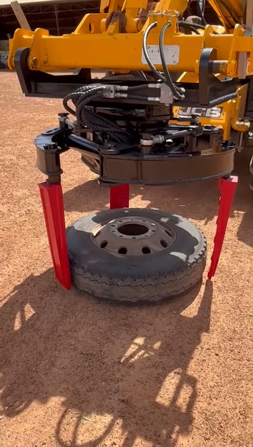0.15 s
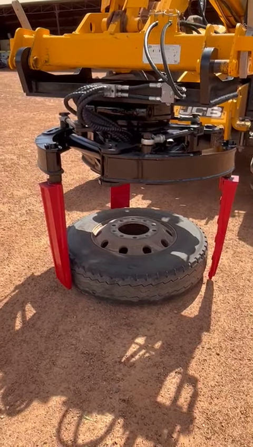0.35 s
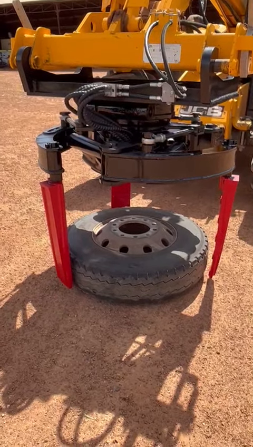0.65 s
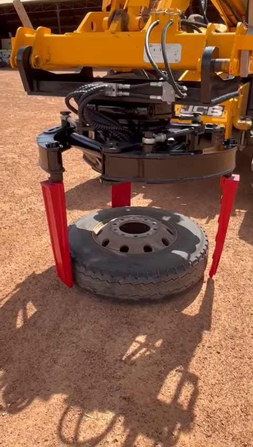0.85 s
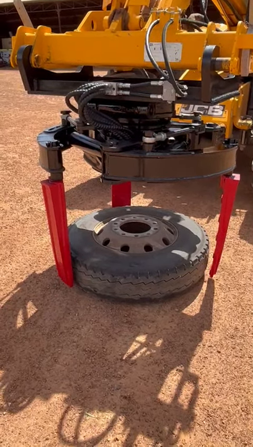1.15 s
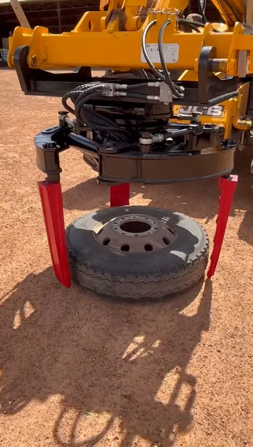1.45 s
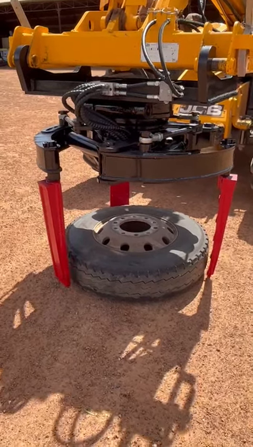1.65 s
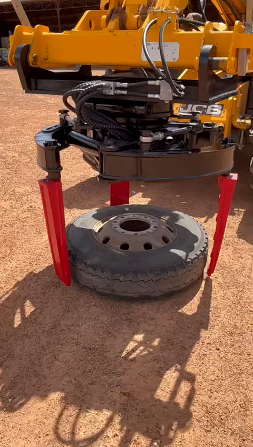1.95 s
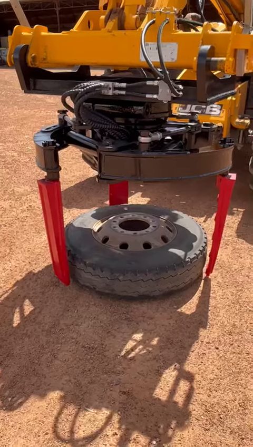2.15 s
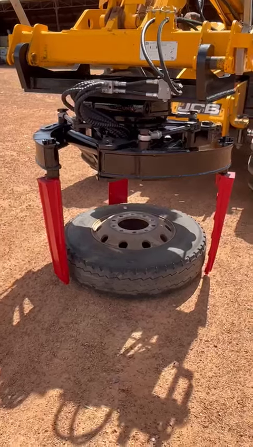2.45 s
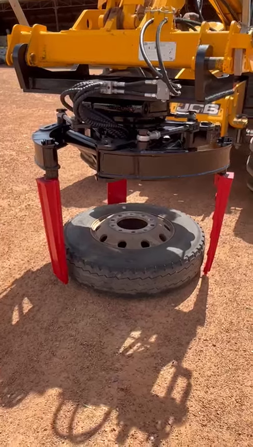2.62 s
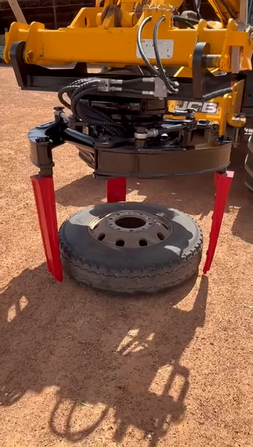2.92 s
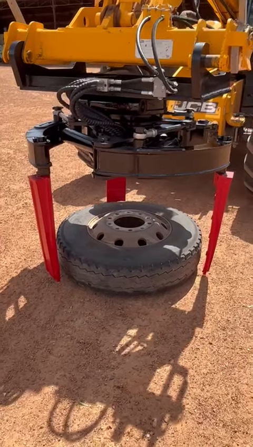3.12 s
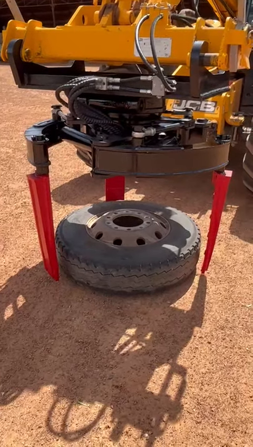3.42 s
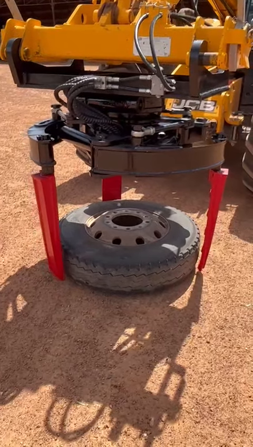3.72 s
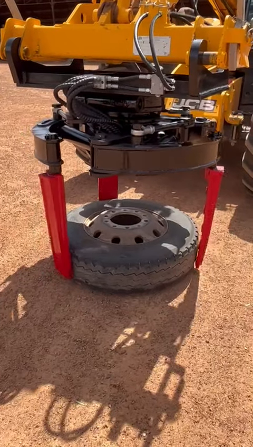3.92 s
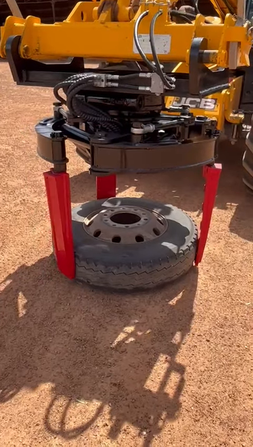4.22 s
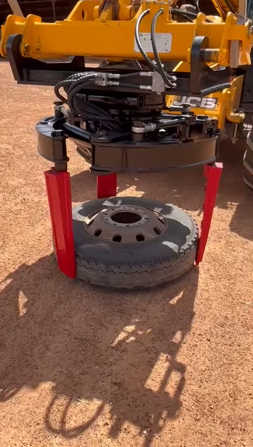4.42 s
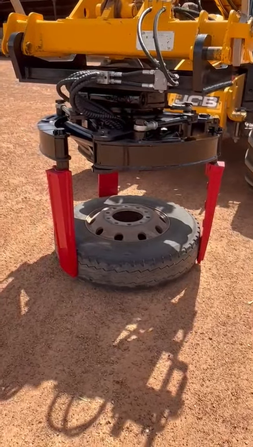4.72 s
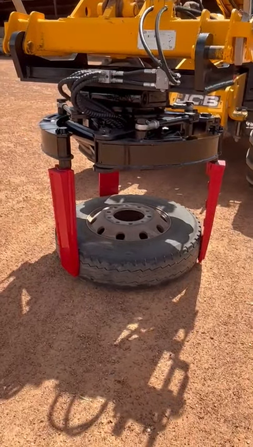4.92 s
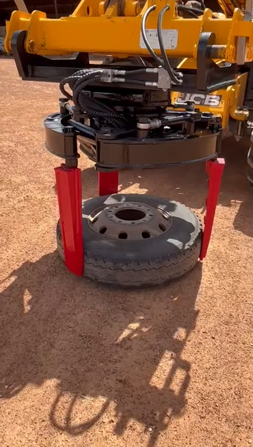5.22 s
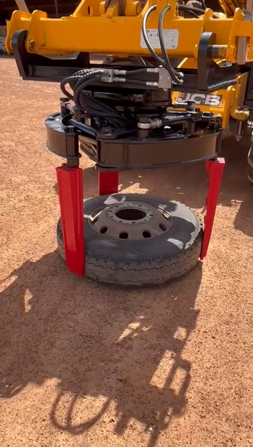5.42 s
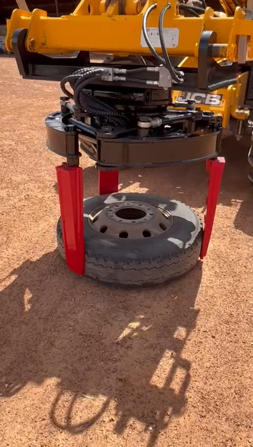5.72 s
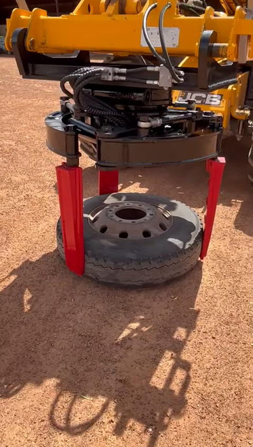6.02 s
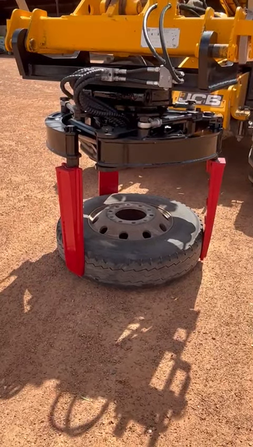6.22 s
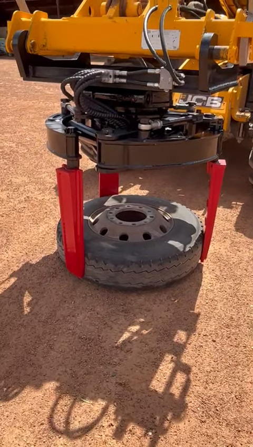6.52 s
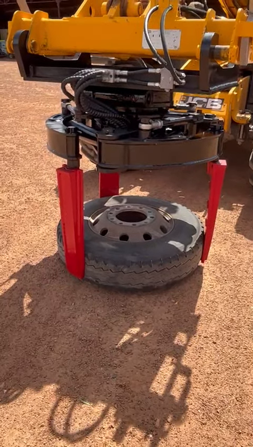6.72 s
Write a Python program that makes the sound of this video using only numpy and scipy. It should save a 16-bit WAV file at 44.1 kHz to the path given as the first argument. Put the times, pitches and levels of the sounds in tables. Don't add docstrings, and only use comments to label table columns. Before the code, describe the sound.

A diesel machine idles with a clattering rattle and hydraulic hiss while gusts of wind rumble and tear across the microphone in an open yard.

```python
import sys
import numpy as np
from scipy import signal
from scipy.fft import rfft, irfft, next_fast_len
from scipy.io import wavfile
from scipy.ndimage import uniform_filter1d

SR = 44100
rng = np.random.default_rng(int(sys.argv[2]) if len(sys.argv) > 2 else 0)


def undo_db(level):
    steps = np.asarray(level, float) / 20
    return 10 ** steps


def transcribe(signal):
    frames = np.atleast_2d(signal).T
    limited = np.clip(frames, -1, 1)
    pcm = np.round(limited * 32767).astype(np.int16)
    wavfile.write(sys.argv[1], SR, pcm)


N = 302721
T = np.arange(N) / SR


def evened(x):
    return x / np.sqrt(np.mean(x ** 2, axis=-1, keepdims=True) + 1e-20)


def curve(rows, order=1, at_s=T):
    rows = np.array(rows)
    return np.interp(at_s, rows[:, 0], rows[:, order])


# frequency in Hz, lead in radians.
PORT_PHASE = [(60, 1.4), (330, 2), (480, 3.1), (700, 4.6), (1000, 5.5), (1800, 5.5), (2700, 8.1),
              (4000, 8.3), (7000, 4.7)]


def noise_pair(mid_rows, side_rows, alike):
    size = next_fast_len(N)
    log_hz = np.log(np.fft.rfftfreq(size, 1 / SR) + 1)

    def read(rows, end):
        rows = np.array(rows)
        return np.interp(log_hz, np.log(rows[:, 0] + 1), rows[:, 1], end, end)

    mid, other = rfft(rng.standard_normal((2, size)))
    shared = mid * np.exp(1j * read(PORT_PHASE, None))
    side = alike * shared + np.sqrt(1 - alike ** 2) * other
    shaped = [mid * undo_db(read(mid_rows, -120)), side * undo_db(read(side_rows, -120))]
    return evened(irfft(shaped, size)[:, :N])


def lumps(hz, depth_db):
    lowpass = signal.butter(2, hz, fs=SR, output="sos")
    slow = signal.sosfiltfilt(lowpass, rng.standard_normal(N) * (T > 0), padtype=None)
    return evened(undo_db(depth_db * evened(slow)))


def whistle(hz, width_hz):
    r = np.exp(-np.pi * width_hz / SR)
    noise = rng.standard_normal(N) + 1j * rng.standard_normal(N)
    slow = signal.lfilter([1], [1, -2 * r, r * r], noise)
    carrier = np.exp(2j * np.pi * np.cumsum(hz * np.ones(N)) / SR)
    return evened((slow * carrier).real)


def ringing(rows):
    size = next_fast_len(N)
    hz, rows = np.fft.rfftfreq(size, 1 / SR), np.array(rows)
    shape = (1 + (2 * (hz - rows[:, :1]) / rows[:, 1:2]) ** 2) ** -2.0
    power = undo_db(rows[:, 2:].T) ** 2 @ (shape / shape.mean(1, keepdims=True))
    noise = rfft(rng.standard_normal((len(power), size)))
    return irfft(noise * np.sqrt(power), size)[:, :N]


def patchy(x, depth_db):
    z = signal.stft(x, nperseg=512, noverlap=384)[2]
    field = uniform_filter1d(rng.standard_normal(z.shape[1:]), size=4, axis=0)
    field = uniform_filter1d(field, size=9, axis=1)
    gain = undo_db(depth_db * field / field.std())
    gain = gain / np.sqrt(np.mean(gain ** 2))
    return signal.istft(z * gain, nperseg=512, noverlap=384)[1][:, :N]


# time in seconds, level in dB over idle.
PRESSURE = [(0, -1), (.65, 1.5), (.8, -4), (1.15, -4), (1.3, -1), (2.85, 1), (2.92, 5), (3.03, 5),
            (3.1, .5), (3.6, 1), (3.72, 7), (4.1, 8.5), (4.18, 2), (4.9, 1), (5.1, 4), (5.4, 4.5), (5.6, 1),
            (6.86, 0)]


def oil_pressure_db():
    return curve(PRESSURE)


CYLINDER_DB = [7.1, 4.3, 0.79, 0.41]


def knocks():
    firing_hz, first_s = 28.28, .1212
    turns = (T - first_s) * firing_hz
    firing = np.floor(turns).astype(int)
    chance_db = 2.2 * np.clip(rng.standard_normal(firing.max() + 9), -2, 1.5)
    strength = undo_db(np.array(CYLINDER_DB)[firing % 4] + chance_db[firing])
    return uniform_filter1d(strength * np.exp(-(turns % 1) / .25), size=80)


# frequency in Hz, width in Hz, mid in dB, side in dB.
HUMS = [(127.2, 2, -42, -56), (6000, 30, -109, -67.5)]
# multiple of the firing rate, level in dB.
ORDERS = [(6.2, -46), (13.2, -52), (14.05, -44.5), (16, -46), (17.6, -55), (18.6, -52), (43, -58),
          (45, -65.5)]


def exhaust():
    firing_hz, order_width_hz = 28.28, 2.5
    hums = sum(undo_db([[mid_db], [side_db]]) * whistle(hz, width_hz)
               for hz, width_hz, mid_db, side_db in HUMS)
    orders = ringing([(k * firing_hz, order_width_hz, db) for k, db in ORDERS])[0]
    hums[0] += undo_db(np.interp(T, (2.6, 3.0), [0, -12])) * orders
    return hums


# frequency in Hz, density in dB per Hz.
BLOCK_MID = [(350, -58), (600, -1.5), (900, 2.5), (1200, -1.5), (1470, -4.5), (1950, -6), (2500, -10),
             (3000, -13), (3700, -16.5), (4500, -18.5), (5050, -15.5), (5350, -24.5), (5700, -44.5),
             (6200, -89)]
BLOCK_SIDE = [(300, -34.5), (500, 1.5), (900, -6), (1200, -7), (1500, -13.5), (1900, -17), (2300, -12),
              (2700, -8), (3300, -22.5), (4500, -22), (5500, -23), (6550, -23), (6850, -32), (7350, -70.5)]
# frequency in Hz, width in Hz, mid in dB, side in dB.
PANELS = [(990, 40, -59.5, -60.5), (1083, 50, -58, -66), (1290, 61, -59.5, -64), (1596, 90, -57.5, -62.5),
          (1717, 52, -57.5, -62.5), (1812, 41, -66, -75.5), (1927, 45, -61, -72.5),
          (1999, 43, -61.5, -72.5), (2313, 95, -57.5, -60), (2643, 31, -64, -65.5),
          (2864, 87, -71.5, -61.5), (3214, 48, -67.5, -69)]


def engine():
    blow = knocks()
    load = undo_db(0.48 + .42 * np.maximum(oil_pressure_db(), 0))
    block = patchy(noise_pair(BLOCK_MID, BLOCK_SIDE, alike=0.33), depth_db=2.5)
    block = block * undo_db([[-43], [-45]]) + ringing(PANELS)
    head = undo_db(-49.5) * whistle(1915, 500) * blow * [[1], [.2]]
    return (block * evened(1 + 0.29 * blow) + head) * load + exhaust()


# frequency in Hz, density in dB per Hz.
HISS_MID = [(5900, -71.5), (6700, -13), (7000, -2), (7600, 0), (8700, -2.5), (9300, -9), (9700, -22),
            (10000, -40), (10800, -40), (11250, -8), (11650, -7), (11950, -18), (12300, -74.5)]
HISS_SIDE = [(8500, -52), (9050, -9), (9600, -3), (10400, -3), (11100, -6), (11500, -12), (12000, -60)]
# frequency in Hz, density in dB per Hz.
SPRAY = [(2200, -30), (2800, -5), (4600, 3), (5400, -4.5), (5750, -18.5), (6100, -60.5)]


def valves():
    pressure_db = oil_pressure_db()
    hiss_db = -68 + pressure_db * [[.9], [1.4]] + np.array([[0], [-3.5]])
    hiss = noise_pair(HISS_MID, HISS_SIDE, alike=.3) * undo_db(hiss_db) * lumps(hz=30, depth_db=.8)
    spray = noise_pair(SPRAY, SPRAY, alike=0.37) * undo_db(-64 + pressure_db) * lumps(hz=24, depth_db=0.5)
    sizzle = whistle(11450, 300) * undo_db(-100 + 3.9 * pressure_db) * lumps(hz=12, depth_db=3)
    strip = whistle(6560, 140) * undo_db(-76) * lumps(hz=11, depth_db=4)
    return hiss + spray + sizzle * [[1.8], [-1.3]] + strip * [[1], [.2]]


def pump():
    pressure_db = oil_pressure_db()
    coast_db = -16 * np.interp(T, (.72, .8, 1.2, 1.3), [0, 1, 1, 0])
    whine_db = -58.5 + .3 * pressure_db + coast_db
    whine_db = whine_db + np.array([[-.5], [-7]]) + pressure_db * [[0], [.7]]
    return whistle(4025, 115) * undo_db(whine_db) * [[1], [-1]] * lumps(hz=14, depth_db=1.2)


# time in seconds, level in dB.
GUST = [(0, -25), (.35, -22), (.65, -24.5), (1.3, -22.5), (1.6, -22.5), (2.0, -29), (2.5, -27), (2.8, -18),
        (3.1, -26), (3.4, -15), (3.6, -22), (3.9, -10.5), (4.22, -24.5), (4.55, -23.5), (5.2, -29),
        (5.9, -24), (6.2, -24.5), (6.86, -22)]


def gust_over_usual_db():
    return curve(GUST) + 28


# time in seconds, side minus mid in dB.
CROSS = [(0, -13), (2.1, -7), (2.6, -5.5), (2.8, 3), (3.12, 15.5), (3.3, 6), (3.55, 10), (3.82, 0.5),
         (3.95, 17), (4.15, -3.5), (4.4, 11), (4.8, 3.5), (5.12, -5), (5.5, -2.5), (5.8, 3), (5.92, 7.5),
         (6.25, -5), (6.86, -4.5)]


def cross_db(at_s=T):
    return curve(CROSS, at_s=at_s)


# time in seconds, edge in Hz.
MONO_BELOW = [(0, 578), (1.5, 555), (2.2, 335), (2.6, 263), (2.9, 169), (3.3, 146), (3.7, 56.6),
              (4.2, 36.7)]


def mono_edge_hz(at_s=T):
    return curve(MONO_BELOW, at_s=at_s)


def mono_blend(pair, mono_rows):
    mono = np.clip(mono_edge_hz() / 300 - .3, 0, 1)
    other = noise_pair(mono_rows, mono_rows, alike=0)[0]
    pair[0] = np.sqrt(1 - mono) * pair[0] + np.sqrt(mono) * other
    return pair


def steady(x, ms):
    power = uniform_filter1d(x ** 2, round(ms * SR / 1000), axis=1)
    return evened(x / np.sqrt(abs(power) + .08))


def split(db, lean_db):
    return db - 10 * np.log10(1 + undo_db([lean_db, -lean_db]) ** 2)


def leaning(rows):
    s, db, lean_db, ms = np.transpose(rows)
    return np.transpose([s, *split(db, lean_db), ms])


def bursts(rows, rise):
    power = np.zeros((2, N))
    for s, mid_db, side_db, ms in rows:
        near = slice(max(round((s - ms / 500) * SR), 0), round((s + ms / 500) * SR))
        late = (T[near] - s) * 1000 / ms
        bell = np.exp(-2.8 * np.where(late < 0, late / rise, late) ** 2)
        power[:, near] += undo_db([[mid_db], [side_db]]) ** 2 * bell
    return power


# frequency in Hz, density in dB per Hz.
RUMBLE = [(15, -38), (30, -25.5), (50, 0.5), (70, 1.5), (120, -3), (200, -14), (300, -18.5), (500, -42)]
RUMBLE_MONO = [(15, -33.5), (30, -19), (50, -3), (70, 2.5), (120, -1), (200, -8), (300, -11.5), (500, -35)]
# time in seconds, strength in dB, side minus mid in dB, length in ms.
THUDS = [(0.244, -24, -7, 93), (0.334, -20.5, 2, 50), (0.393, -18.5, -9, 63), (0.551, -17, -11, 38),
         (0.842, -15, -12, 39), (0.962, -20.5, -10, 23), (1.223, -20, 2, 59), (1.327, -17, -5, 22),
         (1.562, -17, -8, 41), (1.612, -20.5, -8, 34), (1.671, -20.5, -5, 48), (1.792, -20.5, -14, 44),
         (2.212, -25.5, -7, 31), (2.412, -18.5, 0.5, 35), (2.729, -10, -2, 36), (2.792, -8.5, -4, 41),
         (2.837, -13, -15, 28), (3.038, -23, -15, 51), (3.231, -20, 2, 82), (3.284, -16.5, -3, 32),
         (3.35, -17.5, -9, 34), (3.444, -15.5, -7, 47), (3.556, -20, -23, 42), (3.646, -22, -1, 29),
         (3.735, -23, -6, 30), (3.87, -16, -18, 30), (3.947, -12.5, -5, 22), (4.023, -19, 2, 67),
         (4.09, -6, -3, 18), (4.135, -8, -7, 19), (4.171, -19.5, -2, 68), (4.371, -25.5, -3, 340),
         (4.546, -14, -0.5, 26), (4.617, -23, -5, 44), (4.727, -18, -6, 11), (4.887, -27, 3, 46),
         (4.979, -20, -4, 21), (5.116, -17, -1, 44), (5.192, -18.5, 1, 67), (5.36, -22.5, -3, 60),
         (5.543, -28, 4, 27), (5.673, -22, -5, 41), (5.869, -16.5, -1, 116), (5.923, -23, -3, 61),
         (5.992, -16.5, -6, 25), (6.285, -14.5, -2, 27), (6.344, -18.5, -3, 30), (6.406, -22, -7, 54),
         (6.577, -24.5, 10, 24), (6.705, -28, 1, 31)]


def rumble():
    noise = steady(mono_blend(noise_pair(RUMBLE, RUMBLE, alike=0.76), RUMBLE_MONO), ms=18)
    level_db = gust_over_usual_db() - 28 - 3.0
    bed = undo_db(split(level_db, np.full(N, -5))) * lumps(hz=24.8, depth_db=4.5)
    return np.sqrt(bed ** 2 + bursts(leaning(THUDS), rise=0.66)) * undo_db(-3.0) * noise


def small_eddies(roar_db):
    when, size, long = rng.random((40, 3)).T
    s = when * T[-1]
    db = np.interp(s, T, roar_db) + 9 - 9 - 2 * np.log(size + 0.25)
    ms = 15 * (.5 + long)
    return leaning(np.transpose([s, db, np.interp(s, T, cross_db()), ms]))


# frequency in Hz, density in dB per Hz.
ROAR = [(120, -26.5), (220, -0.5), (330, -2), (500, -6.5), (650, -13.5), (900, -22.5), (1500, -56.5)]
ROAR_SIDE = [(120, -34.5), (220, -2.5), (400, 4), (600, -9), (900, -5.5), (1300, -17), (1900, -44.5)]
ROAR_MONO = [(120, -12.5), (220, -1), (330, 0.5), (480, -5.5), (580, -14.5), (900, -25), (1500, -46.5)]
# time in seconds, strength in dB, side minus mid in dB,
# length in ms.
PUFFS = [(0.197, -39, -8, 20), (0.341, -15, -11, 49), (0.373, -12.5, -7, 16), (0.418, -31, -13, 9.8),
         (0.438, -21, -17, 11), (0.537, -19, -8, 33), (0.819, -14, -8, 28), (1.081, -24, -23, 11),
         (1.161, -18.5, -21, 19), (1.218, -18.5, -15, 25), (1.289, -14.5, -19, 14), (1.327, -31, -15, 17),
         (1.557, -15.5, -12, 41), (1.668, -21, -14, 26), (1.788, -7.5, -30, 5.6), (2.403, -26, -15, 37),
         (2.737, -14.5, -0.5, 23), (2.782, -20, -5, 67), (2.822, -12, 2, 30), (2.845, -8.5, -3, 6.6),
         (3.183, -17, 2, 25), (3.279, -14.5, 1.5, 31), (3.335, -16, 5, 14), (3.433, -15, 4, 30),
         (3.546, -17, 21, 37), (3.643, -17.5, 2.5, 33), (3.685, -21, 12, 58), (3.872, -10.5, 6, 11),
         (3.938, -25, -1, 22), (3.978, -12, 5.5, 32), (4.025, -17.5, 3, 20), (4.077, -13.5, 12, 37),
         (4.136, -9, 9, 9), (4.164, -20, 17, 55), (4.342, -29, 13, 12), (4.54, -23, 5, 15),
         (4.571, -24, -1, 9.1), (5.106, -23, 8, 55), (5.407, -28, 18, 24), (5.533, -25.5, -1, 20),
         (5.639, -24, 0, 48), (5.775, -23.5, 5, 84), (5.857, -14, 2.5, 29), (5.9, -20.5, -6, 46),
         (5.939, -13.5, 0, 18), (5.978, -15.5, 1, 27), (6.279, -18, 1, 53), (6.343, -19.5, 3, 17),
         (6.426, -19, -6, 13), (6.812, -23.5, 8, 68)]


def roar():
    noise = steady(mono_blend(noise_pair(ROAR, ROAR_SIDE, alike=0.46), ROAR_MONO), ms=7.9)
    roar_db = -31 + 0.69 * gust_over_usual_db() - 0.091 * cross_db()
    bed = undo_db(split(roar_db - 1.5, cross_db())) * lumps(hz=39.7, depth_db=3.5)
    puffs = bursts(np.concatenate([leaning(PUFFS), small_eddies(roar_db)]), rise=0.51)
    return np.sqrt(bed ** 2 + puffs) * undo_db(-5.5) * noise


# frequency in Hz, density in dB per Hz.
RIP = [(400, -13.5), (620, -1), (1000, -10), (1500, -21), (2200, -31.5), (3500, -52)]
# time in seconds, strength in dB, side minus mid in dB, length in ms.
RIPS = [(0.198, -33, 9, 22), (0.366, -36, -4, 62), (0.422, -25, 1, 12), (0.533, -19.5, -8, 5.6),
        (0.97, -38, -4, 30), (0.819, -29, 11, 16), (1.159, -33, 2, 8.8), (1.652, -31, -5, 8.2),
        (1.769, -31, 9, 15), (2.708, -22, 10, 22), (2.731, -21, 6, 10), (2.781, -17, -1, 12),
        (2.825, -18, -13, 9), (2.844, -40, 14, 12), (3.296, -23, 18, 19), (3.34, -27, 20, 18),
        (3.446, -24.5, 8.5, 30), (3.492, -25.5, 6, 31), (3.643, -39, 9, 15), (3.652, -32.5, 10, 41),
        (3.705, -25.5, 4, 20), (3.77, -42, 13, 20), (3.805, -29, 2, 28), (3.843, -20.5, -6, 16),
        (3.88, -19.5, -2, 11), (3.857, -24, 0, 36), (3.928, -39, 20, 14), (3.973, -17.5, -8.5, 26),
        (4.023, -16, 0.5, 33), (4.072, -16, 6, 12), (4.088, -15.5, 0, 45), (4.118, -11.5, -8, 10.6),
        (4.167, -19, -2, 5.2), (4.182, -18.5, -4, 5.4), (4.204, -27, -2, 23), (4.23, -34, 3, 25),
        (4.505, -25, 3.5, 40), (4.535, -32, -5, 31), (5.104, -24.5, -5, 6.4), (5.209, -27, -2, 11),
        (5.753, -30.5, -8, 48), (5.865, -23, 6.5, 25), (5.918, -36, 1, 8.9), (5.938, -21, 14, 14),
        (5.971, -41, 14, 22), (6.064, -37, 0, 10), (6.277, -15, 1.5, 9.9), (6.4, -28, 4, 24),
        (6.475, -30.5, -6, 9.9), (6.551, -30, -3, 17)]


def rip():
    noise = steady(noise_pair(RIP, RIP, alike=0.16), ms=4.9)
    rip_db = -43.5 + 0.33 * gust_over_usual_db() + .9 * np.minimum(cross_db(), 8)
    bed = undo_db(split(rip_db - 5.5, cross_db() + 6)) * lumps(hz=60, depth_db=5.0)
    return np.sqrt(bed ** 2 + bursts(leaning(RIPS), rise=.22)) * undo_db(-2.0) * noise


# time in seconds, strength in dB.
POPS = [(.198, -17.5), (.323, -16), (.366, -21), (.421, -14), (.534, -30), (0.816, -20.5), (1.557, -20),
        (1.652, -15), (1.77, -16), (2.734, -18.5), (2.78, -15.5), (2.825, -12.5), (3.181, -16),
        (3.833, -13.5), (3.97, -18), (4.072, -28), (4.117, -15.5), (4.182, -33), (4.505, -21.5),
        (5.104, -27), (5.856, -26), (5.9, -14), (6.276, -22), (6.838, -17.5)]


def pops():
    t = np.arange(2000) / SR
    hz = 130 + 600 * np.exp(-t / 0.00379)
    jolt = np.sin(2 * np.pi * np.cumsum(hz) / SR) * np.exp(-t / 0.011)
    jolt = jolt * (1 - np.exp(-(t / .0005) ** 2))
    hits = np.zeros(N)
    s, db = np.transpose(POPS)
    hits[np.round(s * SR).astype(int)] = -undo_db(db)
    out = signal.oaconvolve(hits, jolt)[:N]
    return uniform_filter1d(uniform_filter1d(out, size=13), size=9) * [[1], [.3]]


# time in seconds, pitch in Hz.
BIRD = [
    [(1.15, 2900), (1.17, 3350), (1.19, 3500)],
    [(1.24, 3050), (1.28, 2700), (1.31, 2170)],
    [(1.36, 2730), (1.41, 2900)],
    [(1.41, 2600), (1.445, 2650)],
]


def bird():
    out = np.zeros(N)
    for note in BIRD:
        near = slice(round(note[0][0] * SR), round(note[-1][0] * SR))
        hz = curve(note)[near]
        tone = np.sin(2 * np.pi * np.cumsum(hz) / SR)
        out[near] = undo_db(-54) * tone * signal.windows.tukey(len(hz), .6)
    return out * [[.6], [1]]


# time in seconds, level in dB.
BELT = [
    (1.6, -85),
    (2, -69),
    (2.3, -64),
    (2.6, -72),
    (3.2, -90),
]


def belt():
    return whistle(4985, 32) * undo_db(curve(BELT)) * [[1], [.4]]


# time in seconds, level in dB.
TICKS = [
    (3.407, -46),
    (6.278, -56),
]


def bright_ticks():
    clicks = np.zeros(N)
    for s, db in TICKS:
        clicks[round(s * SR)] = undo_db(db + 19)
    band = signal.butter(2, [6800, 11300], "bandpass", fs=SR, output="sos")
    return signal.sosfilt(band, clicks) * [[1], [.8]]


# time in seconds, pitch in Hz, level in dB.
RELIEF = [
    (5.7, 6940, -97),
    (5.85, 7040, -68),
    (6.4, 7040, -65),
    (6.5, 7040, -90),
]


def relief_valve():
    level_db = curve(RELIEF, order=2) + np.array([[-2], [-4]])
    return whistle(curve(RELIEF), 40) * undo_db(level_db)


def scene():
    machine = engine() + valves() + pump() + belt() + bright_ticks() + relief_valve()
    wind = rumble() + roar() + rip() + pops()
    mid, side = machine + wind + bird()
    return np.array([mid + side, mid - side])


# frequency in Hz, margin in dB.
MASK = [(400, 30), (560, 14), (750, 11), (3000, 9), (5000, 6), (6300, 3), (6800, 5), (7200, 7), (8800, 6),
        (9500, 1), (11000, -3), (12000, -4)]


def drop_masked(z, hz, at_s):
    power = abs(z) ** 2
    narrow = np.add.reduceat(power, np.arange(0, 1025, 4), axis=1) / 4
    narrow = uniform_filter1d(np.repeat(narrow, 4, axis=1)[:, :1025], size=2, axis=2)
    louder = uniform_filter1d(power, size=17, axis=1).max(0)
    louder = uniform_filter1d(louder, size=3, axis=1)
    frames = len(at_s)
    wander_db = np.kron(rng.standard_normal((2, 129, frames // 2 + 1)), np.full((8, 2), 6))
    wander_db = wander_db[:, :1025, :frames]
    wander_db -= 3 * .42 * np.clip(cross_db(at_s), 0, 10) * (abs(hz - 1050) < 450)
    wander_db *= np.maximum(np.sqrt(hz / 9000), hz / 7500)
    spared_db = 5 * (hz > 5000) * np.array([0, 1])[:, None, None]
    margin_db = spared_db + np.interp(hz, *np.transpose(MASK)) + wander_db
    return z * (narrow > louder / undo_db(margin_db) ** 2)


def roll_off(x):
    return signal.sosfilt(signal.butter(12, 13340, fs=SR, output="sos"), x)


def record(dry):
    soft = dry / (1 + (dry / .92) ** 6) ** (1 / 6)
    pair = np.array([soft[0] + soft[1], soft[0] - soft[1]]) / 2
    frames = dict(window="cosine", nperseg=2048, noverlap=1024)
    lead = 1024 - 80
    padded = np.pad(pair, ((0, 0), (lead, 0)), mode="reflect")
    hz, t, z = signal.stft(padded, SR, **frames)
    hz, at_s = hz[:, None], t - lead / SR
    z = drop_masked(z, hz, at_s) * (hz < 12000)
    z[1] /= np.sqrt(1 + (mono_edge_hz(at_s) / (hz + 1)) ** 16.0)
    mid, side = signal.istft(z, SR, **frames)[1][:, lead:lead + N]
    return roll_off(np.array([mid + side, mid - side]))


dry = scene()
out = record(dry)
transcribe(out)
```